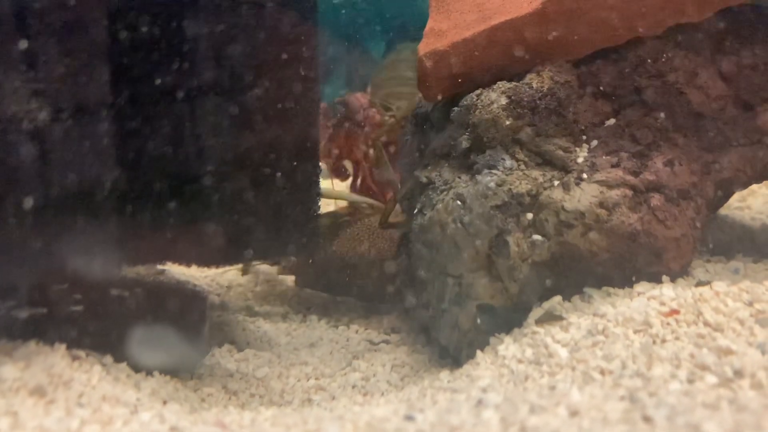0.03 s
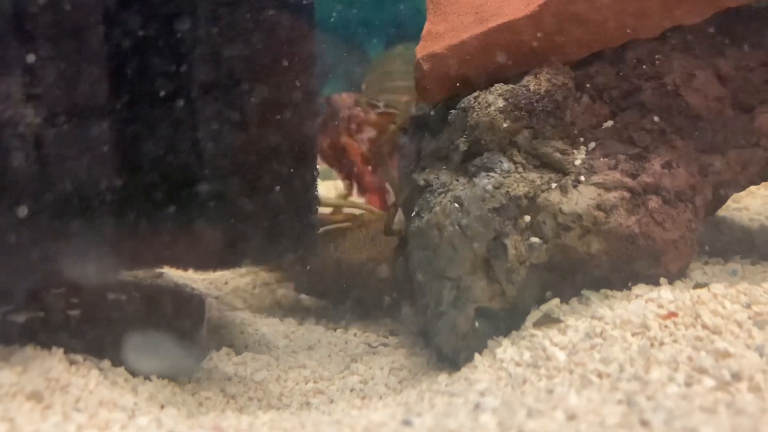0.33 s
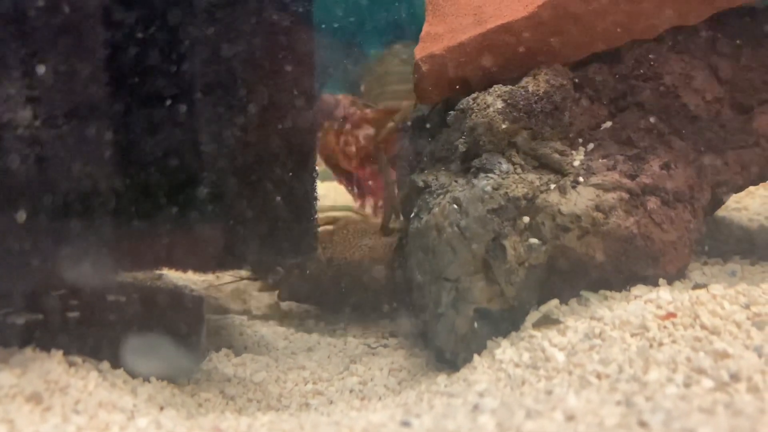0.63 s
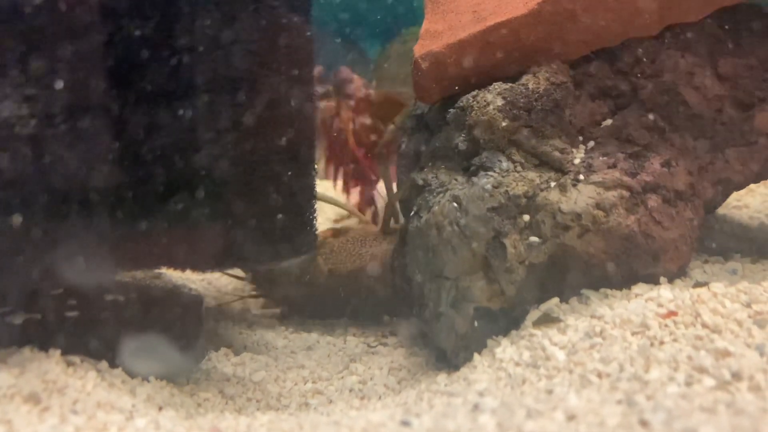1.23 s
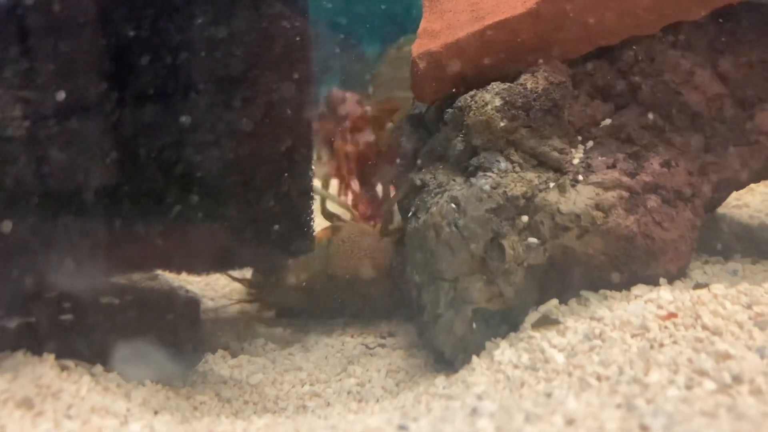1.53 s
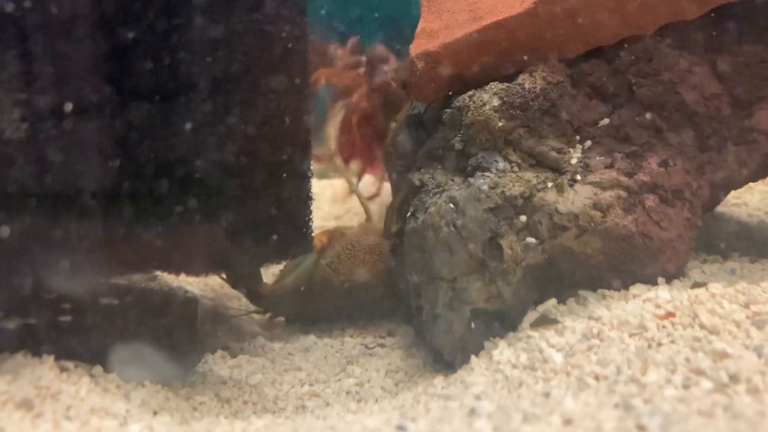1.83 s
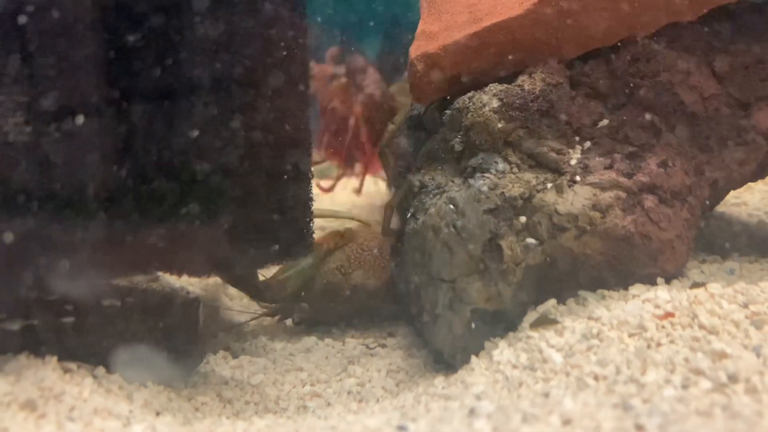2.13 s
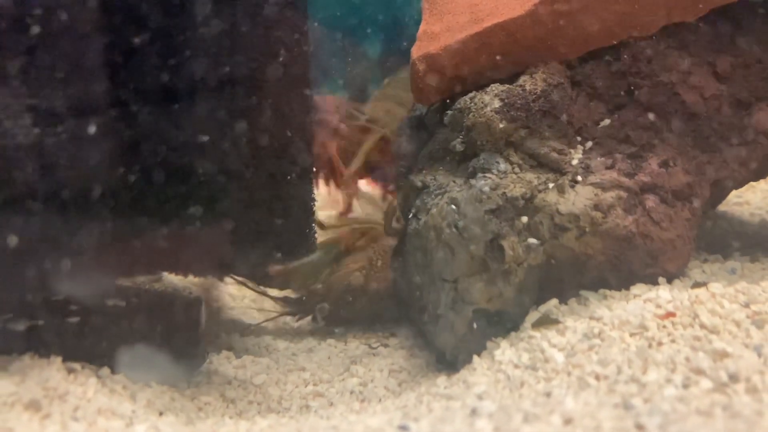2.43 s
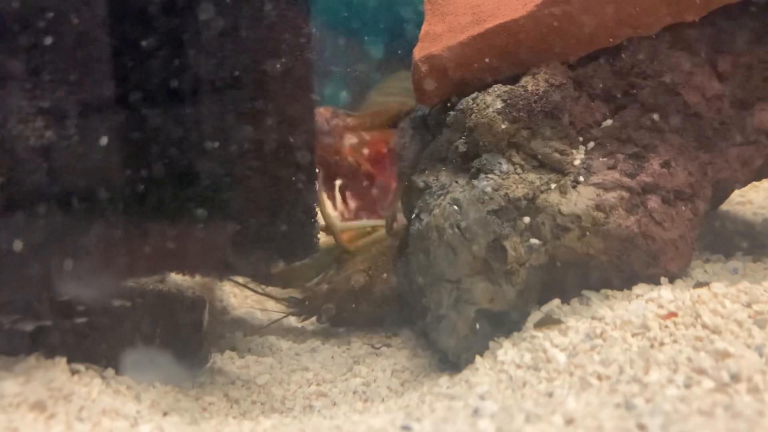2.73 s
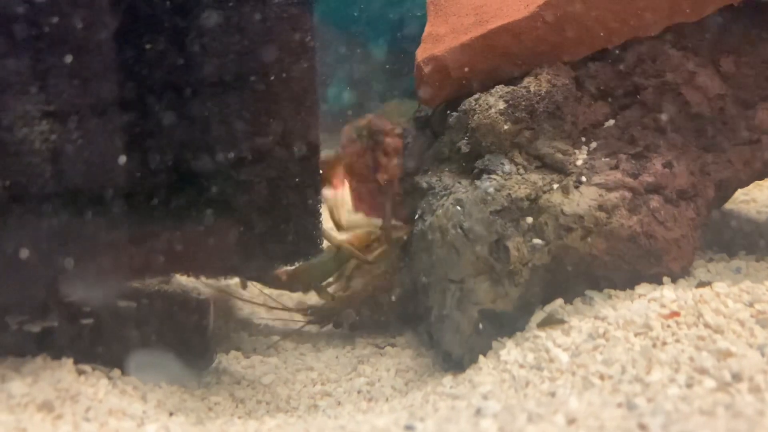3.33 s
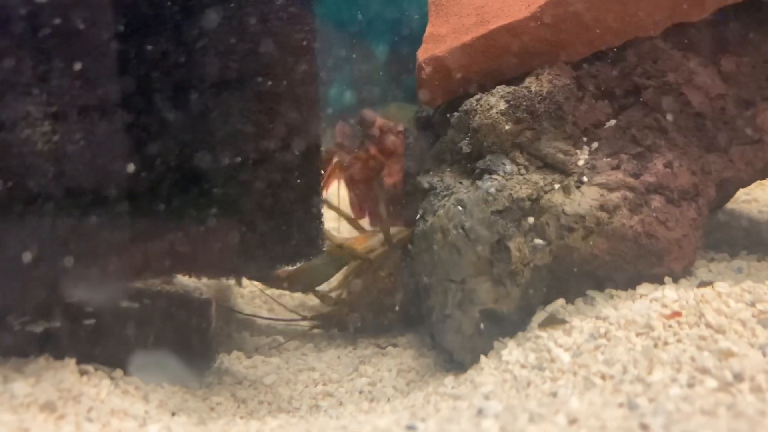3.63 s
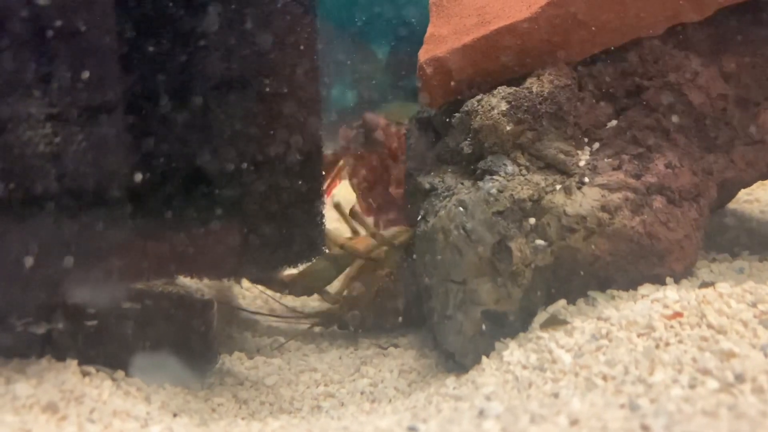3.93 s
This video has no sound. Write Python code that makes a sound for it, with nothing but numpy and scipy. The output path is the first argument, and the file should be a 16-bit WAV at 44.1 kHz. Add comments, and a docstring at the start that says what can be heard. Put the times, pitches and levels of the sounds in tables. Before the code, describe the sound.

One sharp, bright snap cracks from an aquarium at about 0.2 seconds, heard from just outside the glass. The tank rings for an instant and a faint small-room echo is gone by about 0.5 seconds. From the start until the end at 4 seconds, a quiet low pump hum runs with a soft rumble of circulating water and a thin hiss, which brightens slightly after 2 seconds.

```python
"""A snap in an aquarium

One sharp snap, heard from just outside the glass: a bright crack sets the tank ringing briefly,
and a small room adds a faint echo. The pump hums along with the mains power the whole time,
over the rumble and wash of circulating water and a thin hiss."""
import sys
import numpy as np
from scipy.fft import rfft, irfft, next_fast_len
from scipy.io import wavfile
from scipy.ndimage import map_coordinates

SR = 44100
rng = np.random.default_rng(int(sys.argv[2]) if len(sys.argv) > 2 else 0)


def wrap_up_sound(samples):
    """Save the sound to the file named by the first command line argument, as 16-bit audio."""
    columns = np.atleast_2d(samples).T
    # keep every value between -1 and 1, then stretch to whole-number steps
    tamed = np.clip(columns, -1, 1)
    steps = np.round(tamed * 32767).astype(np.int16)
    wavfile.write(sys.argv[1], SR, steps)


N = 176400
T = np.arange(N) / SR
SNAP_S = 0.1872  # when the snap happens

# The bright tone color of the crack. Each row: frequency in Hz, relative level in dB.
CRACK_SPECTRUM = [(300, -103), (2000, -61), (3200, -86), (4200, -73), (5500, -81), (7600, -66.5),
                  (10000, -59), (11800, -72), (13200, -61), (14300, -60), (16000, -71)]

def crack():
    """The snap itself: a burst of noise only a few milliseconds long."""
    return snap_noise(CRACK_SPECTRUM) * burst(attack_s=0.00019, fade_s=0.004, hold_s=0.0013)


# The tone color of the ringing tank. Each row: frequency in Hz, relative level in dB.
TANK_SPECTRUM = [(150, -62), (480, -62.5), (820, -65), (1000, -75.5), (1750, -64.5), (2350, -63.5),
                 (3100, -86.5), (4300, -75), (5300, -87), (6200, -76.5), (8000, -75.5), (9900, -67),
                 (11300, -78), (12800, -76), (14300, -68), (15500, -77)]

def tank_ring():
    """The crack rings the tank at so many pitches that they blur into noise."""
    return snap_noise(TANK_SPECTRUM) * burst(attack_s=0.00076, fade_s=0.053)


# The notes of the glass. Each row: pitch in Hz, level in dB, seconds to fade by 60 dB,
# head start of the left ear in radians.
GLASS_NOTES = [(498, -34.5, 0.059, 0.49), (806, -38.5, 0.046, 1.2), (1176, -39.5, .035, 1.8),
               (1687, -29.5, 0.03, 1.8), (2213, -39, 0.065, .8), (10660, -47, .06, 1.2),
               (11400, -40, .06, 2.4)]

def glass_ring():
    """Just after the crack, the glass vibrates at a few pitches of its own."""
    ring = np.zeros((2, N))
    for hz, db, fade_s, lead in GLASS_NOTES:
        wave = np.sin(2 * np.pi * hz * (T - SNAP_S) + left_right(lead))
        ring += gain(db) * wave * burst(attack_s=0.00076, fade_s=fade_s, delay_s=0.00157)
    return ring


# The tone color of the room's echo. Each row: frequency in Hz, relative level in dB.
ROOM_SPECTRUM = [(200, -100), (1000, -84), (2200, -87.5), (3200, -101), (5500, -103), (8000, -94),
                 (9800, -94), (11200, -92.5), (12700, -97), (14200, -89), (15500, -106)]

def room_echo():
    """The small room answers the snap with a faint tail, different in each ear."""
    return noise(ROOM_SPECTRUM, channels=2) * burst(attack_s=0.0034, fade_s=0.37)


# The tones of the hum. Each row: multiple of the mains frequency, level in dB,
# left minus right level in dB, head start of the left ear in radians.
HUM_TONES = [(1, -52.5, -.5, -0.2), (2, -48, 0, -0.55), (3, -49.5, -1.5, -0.45), (4, -53, -3, -0.67),
             (5, -66.5, -2.5, -1.65), (9, -60.5, -5, 1.74), (10, -72.5, 8.5, 2.5), (12, -73.5, -5.5, 1.5),
             (14, -75.5, 7, 1.2), (15, -69.5, -3, 1.56), (16, -73, 9.5, 1.88)]

def pump_hum(mains_hz=59.98):
    """The pump pushes once per mains cycle, making tones at multiples of that rate."""
    start_phase = 2 * np.pi * rng.random()
    hum = np.zeros((2, N))
    for multiple, db, balance_db, lead in HUM_TONES:
        smear = 0.33 * (multiple - 3) ** 3  # spreads each push out in time
        phase = multiple * start_phase - smear
        hum += wavering_tone(multiple * mains_hz, db, balance_db, lead, waver=0.073, phase=phase)
    return hum


# The tones of the pump's housing. Each row: pitch in Hz, level in dB, left minus right level in dB,
# head start of the left ear in radians, amount of waver from 0 to 1.
HOUSING_TONES = [(90.9, -60.5, 1.5, 0, 0.48), (96.2, -57.5, 1.5, 0, 0.54), (430, -68.5, 0, 2.18, 0.4),
                 (444, -64.5, -5, 1.45, 0.4), (644.2, -60.5, 2, 0.81, 0.11), (767, -67.5, 4.5, 1.5, 0.05)]

def housing_whine():
    """The pump's housing vibrates with its own tones, most of them less steady than the hum."""
    return sum(wavering_tone(*row) for row in HOUSING_TONES)


# Water noise that both ears share. Each row: frequency in Hz, relative level in dB.
WATER_SHARED = [(20, -98), (33, -86), (48, -66.5), (62, -67), (75, -70), (115, -67.5), (138, -80),
                (200, -83.5), (340, -89.5), (460, -84.5), (620, -86.5), (730, -93), (900, -88.5),
                (1070, -101), (1350, -100), (1500, -103), (1750, -102), (2050, -106), (2230, -105),
                (2450, -112), (2700, -113), (3200, -121), (6000, -140)]
# Water noise that is opposite in the two ears, which makes it sound wide. Same columns.
WATER_OPPOSITE = [(20, -105), (35, -97), (50, -78.5), (115, -75), (145, -100.5), (330, -89), (480, -86),
                  (900, -88), (1250, -91), (1500, -102), (2400, -109), (3500, -120), (6000, -140)]

def water():
    """Circulating water makes a low rumble and a soft wash, a little to the right."""
    return wide_noise(WATER_SHARED, WATER_OPPOSITE, balance_db=-2.5)


# Hiss that both ears share. Each row: frequency in Hz, relative level in dB.
HISS_SHARED = [(1500, -125), (3400, -119), (4150, -105), (5200, -115), (6200, -110), (7450, -116),
               (8100, -110), (8550, -100), (9050, -113), (10800, -112), (11700, -118), (12600, -113),
               (14500, -110), (15400, -117)]
# Hiss that is opposite in the two ears. Same columns.
HISS_OPPOSITE = [(1500, -125), (3500, -117), (4300, -108), (5200, -114), (6250, -104), (7000, -109),
                 (8600, -107), (9300, -119), (10800, -107), (12400, -108), (13700, -122), (15200, -117)]
# A very high fizz on top of the hiss. Same columns.
FIZZ_SPECTRUM = [(8800, -140), (9900, -109), (11500, -126), (13200, -117), (14200, -108), (15300, -122)]
# How the fizz swells. Each row: time in seconds, volume change in dB.
FIZZ_SWELL = [(0, -17), (2, -12), (2.6, -5), (4, -6)]

def hiss():
    """A steady thin hiss that gets a little brighter in the second half."""
    steady = wide_noise(HISS_SHARED, HISS_OPPOSITE, balance_db=-0.8)
    swell_db = np.interp(T, *np.transpose(FIZZ_SWELL))
    return steady + noise(FIZZ_SPECTRUM) * gain(swell_db)


def gain(db):
    """Turn decibels into a number to multiply a sound by."""
    return 10 ** (np.asarray(db) / 20)


def left_right(difference):
    """Share out a difference: plus half for the left ear, minus half for the right."""
    return np.array([[0.5], [-0.5]]) * difference


def filtered(sound, response):
    """Scale each frequency in a sound by response(hz)."""
    size = next_fast_len(N + SR // 2)
    hz = np.fft.rfftfreq(size, 1 / SR)
    return irfft(rfft(sound, size) * response(hz), size)[..., :N]


def noise(spectrum, channels=1):
    """Noise whose tone color follows rows of frequency in Hz and level in dB per Hz."""
    row_hz, row_db = np.transpose(spectrum)
    def response(hz):
        return gain(np.interp(np.log(hz + 1), np.log(row_hz + 1), row_db))
    white = rng.standard_normal((channels, N))
    return filtered(white, response) * np.sqrt(SR / 2)


def snap_noise(spectrum):
    """Noise of the snap, which reaches the two ears out of step."""
    shared, opposite = noise(spectrum, channels=2)
    return 0.595 * shared + left_right(1.345) * opposite


def wide_noise(shared, opposite, balance_db):
    """Stereo noise from a shared and an opposite part; a negative balance moves it right."""
    return (noise(shared) + left_right(1.82) * noise(opposite)) * gain(left_right(balance_db))


def burst(attack_s, fade_s, hold_s=0, delay_s=0):
    """Loudness after the snap: it rises quickly and, after the hold, drops 60 dB every fade_s."""
    age = np.maximum(T - SNAP_S - delay_s, 0)
    rise = 1 - np.exp(-age / attack_s)
    fall = np.exp(-np.log(1000) * np.maximum(age - hold_s, 0) / fade_s)
    return rise * fall


def wobble(points_per_s=9):
    """A smooth curve through random points."""
    return map_coordinates(rng.standard_normal(400), [T * points_per_s], mode="wrap")


def wavering_tone(hz, db, balance_db, lead, waver, phase=0):
    """A lasting stereo tone that wavers in loudness and timing."""
    drift = 1 + waver * (wobble() + 1j * wobble())
    angle = 2 * np.pi * hz * T + phase + left_right(lead)
    peak = np.sqrt(2) * gain(db + left_right(balance_db))
    return peak * np.real(drift * np.exp(1j * angle))


def scene():
    """One snap over the running pump, the water and the hiss."""
    snap = crack() + tank_ring() + glass_ring() + room_echo()
    return snap + pump_hum() + housing_whine() + water() + hiss()


def record(dry):
    """Cut away the very highest treble."""
    return filtered(dry, lambda hz: hz < 15500)


dry = scene()
out = record(dry)
wrap_up_sound(out)
```